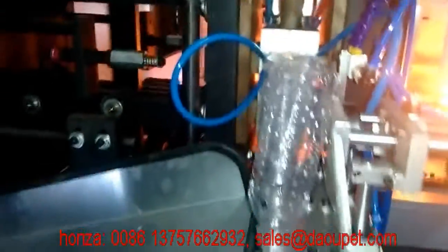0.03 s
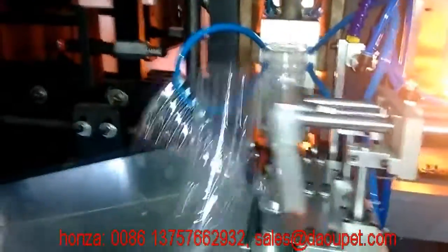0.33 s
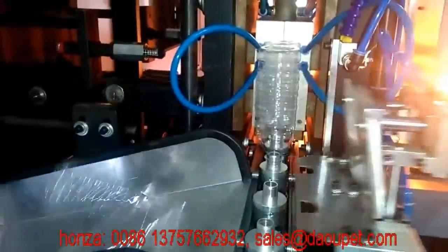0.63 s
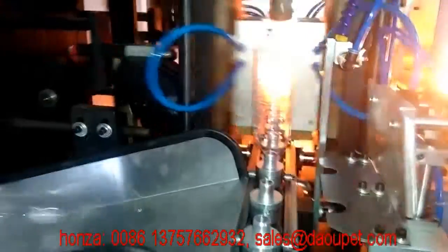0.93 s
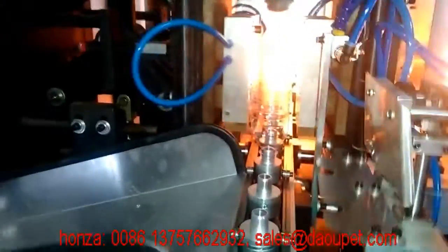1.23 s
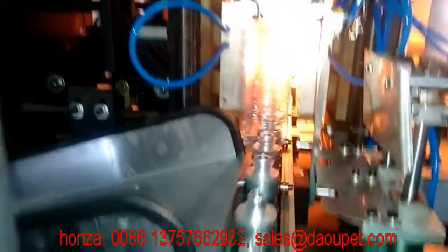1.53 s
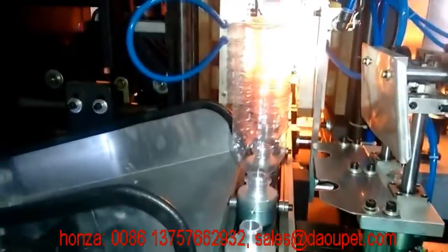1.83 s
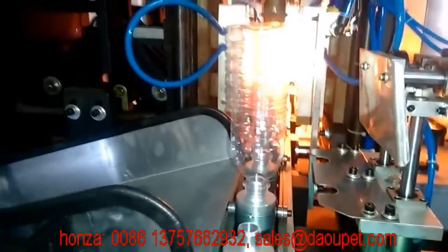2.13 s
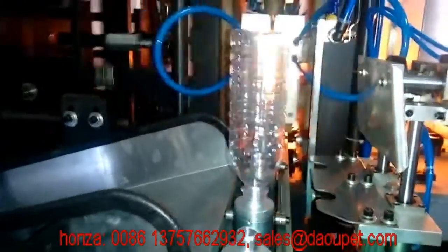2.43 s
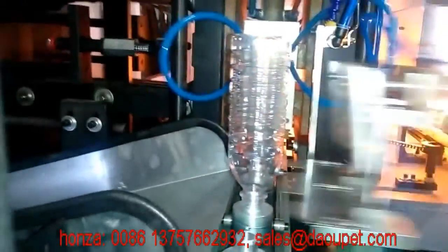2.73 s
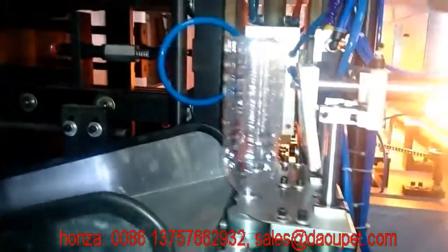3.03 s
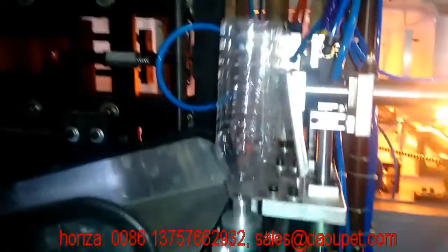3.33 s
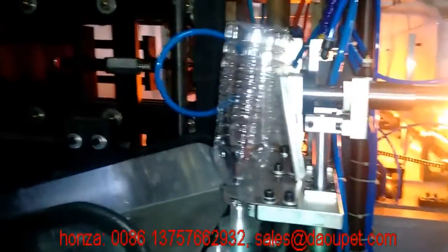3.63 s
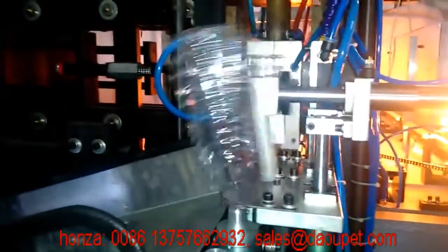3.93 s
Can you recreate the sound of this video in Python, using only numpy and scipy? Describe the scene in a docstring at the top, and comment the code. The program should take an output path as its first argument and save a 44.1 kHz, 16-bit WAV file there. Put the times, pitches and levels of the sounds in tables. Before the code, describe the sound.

Close up in a factory, a bottle blowing machine rumbles and clatters through one cycle. Its mould thuds and valves hiss, a heavy boom leads into whistling air bursts, and a sharp, booming knock precedes the last metal clacks.

```python
"""A bottle blowing machine runs through one cycle, close to a pair of microphones in a factory.
From the start a piston compressor throbs under the rattling drive. The mould thuds, panels knock,
valves let off air and steel grippers clack against their stops; then a slide groans briefly.
At 1.4 s a heavy blow leaves the frame booming, and a run of hissing, whistling jets follows.
Just after 3 s come the hardest knock and a second boom; a last hiss and two clacks end the cycle."""
import sys
import numpy as np
from scipy import signal
from scipy.fft import rfft, irfft
from scipy.io import wavfile

SR = 44100
rng = np.random.default_rng(int(sys.argv[2]) if len(sys.argv) > 2 else 0)


def output_pcm(signal):
    """Save a mono or channel-first signal as 16-bit PCM at the path in sys.argv[1].

    Samples are clipped to [-1, 1] before scaling.
    """
    pcm = np.clip(np.atleast_2d(signal).T, -1, 1) * 32767
    wavfile.write(sys.argv[1], SR, np.round(pcm).astype(np.int16))


N = 176400
T, HZ = np.arange(N) / SR, np.fft.rfftfreq(N, 1 / SR)


def amp(db):
    """Decibels to amplitude ratio."""
    return 10 ** (np.asarray(db) / 20)


def unit(x):
    """Normalisation to rms 1."""
    return x / np.sqrt(np.mean(x ** 2) + 1e-20)


def over_frequency(points):
    """Interpolation along log frequency."""
    hz, value = np.transpose(points)
    return np.interp(np.log(HZ + 1), np.log(hz + 1), value)


def over_time(rows, column):
    """Linear interpolation of one column in time."""
    rows = np.array(rows)
    return np.interp(T, rows[:, 0], rows[:, column])


def white():
    """Two uncorrelated noises: direct and scattered sound."""
    return rng.standard_normal((2, N))


def colour(x, spectrum):
    """Spectral shaping, at rms 1."""
    return unit(irfft(rfft(x) * amp(over_frequency(spectrum)), N))


def drift(rate_hz):
    """Low-pass random fluctuation, at rms 1."""
    return unit(irfft(rfft(rng.standard_normal(N)) / (1 + (HZ / rate_hz) ** 4), N))


def burst(start, t60, rise_s):
    """Linear attack and exponential decay, 60 dB in t60 seconds."""
    t = np.maximum(T - start, 0)
    return np.minimum(t / rise_s, 1) * amp(-60 * t / t60)


def tone(hz, waver_hz=0.99, waver_db=1.5):
    """A sinusoid with slight random frequency and amplitude modulation."""
    turns = np.cumsum(hz + waver_hz * drift(rate_hz=5.25)) / SR + rng.random()
    return np.sqrt(2) * np.sin(2 * np.pi * turns) * amp(waver_db * drift(rate_hz=8))


# Mould and carriage blows. Each row: start in seconds, level in dB, t60 in seconds, treble lift in dB.
MOULD_BLOWS = [(0.074, -14.5, 0.21, -13), (0.389, -14, 0.11, -11), (0.477, -13, 0.069, -14),
               (0.65, -19, 0.41, -4), (1.39, -16.5, 0.68, -9.5), (1.792, -11.5, 0.059, -7),
               (1.99, -17, 0.15, -16), (2.88, -20.5, 0.44, -5.5), (3.16, -14, 0.79, 0.5),
               (3.191, -24, 0.52, 6)]
# The frame's response. Each row: frequency in Hz, relative level in dB.
FRAME_SPECTRUM = [(40, -30), (120, -35), (280, 4.5), (450, -0.5), (800, 2.5), (1200, -4.5), (1800, -11),
                  (2500, -3.5), (3000, -7), (3800, -11.5), (6000, -14), (15000, -35)]

def mould_thuds(treble_hz=1260):
    """Impact excitation: heavy blows shake frame resonances so dense that they merge into noise."""
    out = np.zeros((2, N))
    treble = HZ ** 2 / (HZ ** 2 + treble_hz ** 2)
    for start, db, t60, lift_db in MOULD_BLOWS:
        shake = irfft(rfft(colour(white(), FRAME_SPECTRUM)) * amp(lift_db * treble), N)
        out += amp(db) * shake * burst(start, t60, rise_s=0.0028)
    return out


# Blows on panels. Each row: start in seconds, frequency in Hz, level in dB, t60 in seconds.
PANEL_BLOWS = [(.096, 900, -15, .05), (.316, 1790, -21.5, .055), (.564, 1750, -23, .04),
               (1.393, 470, -13, .035), (1.397, 1210, -16, .06), (1.402, 1655, -22, .05),
               (3.162, 660, -1.5, .028), (3.166, 3050, -11, .03), (3.191, 690, -8.5, .055),
               (3.222, 540, -12, .04)]

def panel_knocks():
    """Damped free vibration: each hard contact sets one panel swinging briefly."""
    return sum(amp(db) * np.sin(2 * np.pi * hz * (T - start)) * burst(start, t60, rise_s=.001)
               for start, hz, db, t60 in PANEL_BLOWS)


# Frame booms. Each row: start in seconds, first and final pitch in Hz, level in dB, t60 in seconds.
FRAME_BOOMS = [(1.401, 339.4, 257.6, -15.5, 0.43), (3.166, 492, 396, -21, 0.92)]

def frame_booms(sag_s=0.086, jitter_hz=14, shudder_hz=66.5):
    """Pitch glide: the frame sags under the heaviest blows, and its shuddering ring falls."""
    out = np.zeros(N)
    for start, from_hz, to_hz, db, t60 in FRAME_BOOMS:
        t = np.maximum(T - start, 0)
        hz = to_hz + (from_hz - to_hz) * np.exp(-t / sag_s) + jitter_hz * drift(rate_hz=72.5)
        ring = np.sin(2 * np.pi * np.cumsum(hz) / SR)
        shudder = 1 - 0.64 * np.cos(2 * np.pi * shudder_hz * t)
        out += amp(db) * ring * shudder * burst(start, t60, rise_s=0.021)
    return out


# Grippers meeting their stops. Each row: start in seconds, relative level in dB,
# decay time of the contact in seconds, brightness in dB per octave.
GRIPPER_HITS = [(0.108, -12, 0.009, 9), (0.137, -24, 0.032, -0.5), (.56, -20, 0.0072, 4),
                (.66, -24.5, 0.02, 16), (0.948, -25, 0.0082, 14), (2.714, -8.5, 0.0031, 15),
                (2.904, -19, 0.0058, 3), (3.904, -13, 0.015, 4), (3.938, -14.5, 0.01, -1.5)]
# Modes of the steel. Each row: frequency in Hz, relative level in dB.
STEEL_MODES = [(1790, -1.5), (2095, 9), (3428, -11), (3800, 3), (4030, 2.5), (4330, -1), (4465, -2),
               (4550, 5.5), (4750, -2.5)]

def gripper_clacks(t60=.055, spread_db=3, detune=.01, scrape_db=-8.5, gain_db=3.5):
    """Modal ringing: a chattering contact force is convolved with the steel's impulse response."""
    out, t = np.zeros((2, N)), T[:SR // 4]
    for start, db, contact_s, tilt_db in GRIPPER_HITS:
        chatter = rng.standard_normal((2, len(t))) * np.minimum(t / 0.0017, 1) * np.exp(-t / contact_s)
        ring = np.zeros(len(t))
        for hz, mode_db in STEEL_MODES:
            struck_db = mode_db + tilt_db * np.log2(hz / 1000) + spread_db * rng.standard_normal()
            struck_hz = hz * (1 + detune * rng.standard_normal())
            ring += amp(struck_db - 60 * t / t60) * np.sin(2 * np.pi * struck_hz * t)
        rung = unit(signal.fftconvolve(chatter, ring[None], axes=1)[:, :len(t)]) * np.std(chatter)
        clack = rung + amp(scrape_db) * chatter
        span = out[:, round(start * SR):][:, :len(t)]
        span += amp(gain_db + db) * clack[:, :span.shape[1]]
    return out


# Air valves. Each row: start in seconds, open time in seconds, level in dB, loss in dB per second.
VALVE_OPENINGS = [(0.09, 0.018, -17, 25), (.135, 0.012, -26, 20), (.305, 0.027, -23, 89),
                  (.385, 0.085, -23, 20), (.52, .14, -25.5, 9), (0.652, 0.013, -13, 32),
                  (1.78, 0.071, -24.5, 25), (1.99, 0.11, -18, 14), (2.1, 0.11, -21.5, 38),
                  (2.22, 0.11, -23.5, 1), (2.47, 0.009, -22, 87), (2.69, 0.058, -21, 17),
                  (2.745, 0.45, -24.5, 15), (3.165, 0.11, -19.5, 29), (3.887, 0.022, -18.5, 4),
                  (3.935, 0.0085, -25, 20)]
# A jet's hiss. Each row: frequency in Hz, relative level in dB.
JET_SPECTRUM = [(500, -31), (2200, -13), (3300, -6.5), (4300, -9), (4950, 0), (6000, 0.5), (6700, -2),
                (8600, 3.5), (10100, 2.5), (11500, -0.5), (13500, -10), (15500, -12)]

def valve_jets(open_s=0.0067, shut_s=0.015):
    """Jet noise: each jet weakens as its pressure falls, and overlapping jets add in power."""
    power = np.zeros(N)
    for start, length, db, loss in VALVE_OPENINGS:
        t = np.maximum(T - start, 0)
        taper_s = 0.091 * length  # long jets swell and die away slowly
        opening = np.minimum(t / (open_s + taper_s), 1)
        closing = np.exp(-np.maximum(t - length, 0) / (shut_s + taper_s))
        power += (opening * closing * amp(db - loss * t)) ** 2
    return colour(white(), JET_SPECTRUM) * np.sqrt(power)


# Whistles. Each row: time of the peak in seconds, half width in seconds, level in dB.
EDGE_TONES = [(1.82, 0.045, -29), (2.712, 0.028, -25), (2.84, 0.096, -27.5)]

def valve_whistles(centre_hz=8560, half_width_hz=300, flutter_db=2.5):
    """Edge tone: a jet crossing a valve's edge gives a breathy, fluttering band."""
    band = unit(irfft(rfft(white()) / (1 + ((HZ - centre_hz) / half_width_hz) ** 2), N))
    swells = sum(amp(db) * np.exp(-((T - peak) / width) ** 2) for peak, width, db in EDGE_TONES)
    return band * swells * amp(flutter_db * drift(rate_hz=35))


# The slide's groan. Each row: time in seconds, pitch in Hz, relative level in dB.
SLIDE_GLIDE = [(.69, 424, -32.5), (.78, 434, -31.5), (.825, 451, -24.5), (.905, 458, -24.5),
               (.935, 471, -32.5), (1.01, 477, -33.5)]

def slide_groan(jitter_hz=5, flutter_db=1.8):
    """Friction-driven vibration: a rubbing guide rises in pitch as it speeds up."""
    turns = np.cumsum(over_time(SLIDE_GLIDE, column=1) + jitter_hz * drift(rate_hz=33)) / SR
    moving = (T > SLIDE_GLIDE[0][0]) & (T < SLIDE_GLIDE[-1][0])
    level_db = over_time(SLIDE_GLIDE, column=2) + flutter_db * drift(rate_hz=51)
    return np.sqrt(2) * np.sin(2 * np.pi * turns) * moving * amp(level_db)


# Levels as heard: they follow the machine and duck abruptly, as under a recorder's gain control
# at sharp clacks. Each row: time in seconds, relative levels of rumble, clatter and leak in dB.
HEARD_LEVELS = [(0, -26.5, -19.5, -24.5), (.095, -21.5, -24.5, -23.5), (.13, -29, -29.5, -31),
                (.28, -30.5, -25.5, -29), (.45, -26, -25, -21), (.65, -24.5, -23, -20),
                (.71, -32.5, -29.5, -25), (1.15, -28, -26.5, -29.5), (1.37, -27, -27.5, -28.5),
                (1.52, -26, -23, -28), (1.92, -20.5, -20, -22.5), (2.15, -25, -23.5, -27),
                (2.32, -22, -21, -25), (2.36, -27.5, -26.5, -25), (2.65, -24.5, -23.5, -26.5),
                (2.8, -28, -22.5, -22.5), (3.02, -21.5, -21.5, -21.5), (3.32, -25.5, -21, -24.5),
                (3.46, -25, -22.5, -27), (3.89, -20, -19, -21.5), (3.925, -29, -27.5, -27),
                (4, -27.5, -24, -26.5)]
# Spectra of the drive's rumble and clatter. Each row: frequency in Hz, relative level in dB.
RUMBLE_SPECTRUM = [(20, -12), (35, -10), (55, -11.5), (85, -3.5), (130, -1.5), (200, 2), (330, 4.5),
                   (480, -1), (900, -13), (3000, -70)]
CLATTER_SPECTRUM = [(60, -39), (200, -14.5), (350, 2.5), (480, -8.5), (800, -2), (1000, -7.5),
                    (1400, -10.5), (1900, -13), (2500, -12.5), (4300, -21.5), (8000, -39), (16000, -60)]
STROKE_HZ = 15.23

def drive(taps_per_s=260, tap_spread_db=4.5, flicker_db=1.2, rumble_db=-5.5, clatter_db=-4.5):
    """Amplitude modulation: the pistons make the rumble throb, while loose parts tap at random."""
    throb = 1 + 0.12 * sum(np.cos(2 * np.pi * k * STROKE_HZ * T) for k in (1, 2, 4))
    rumble = unit(colour(white(), RUMBLE_SPECTRUM) * throb)
    rumble *= amp(rumble_db + over_time(HEARD_LEVELS, column=1))
    taps = white() * amp(tap_spread_db * np.minimum(rng.exponential(1, N), 3))
    taps *= rng.random(N) < taps_per_s / SR
    clatter = colour(unit(white()) + 0.34 * unit(taps), CLATTER_SPECTRUM)
    clatter *= amp(clatter_db + over_time(HEARD_LEVELS, column=2) + flicker_db * drift(rate_hz=18))
    return rumble + clatter


# Compressor harmonics. Each row: multiple of the stroke rate, relative level in dB.
COMPRESSOR_ORDERS = [(6, -50), (8, -41.5), (11, -43.5), (12, -33.5), (13, -39.5), (14, -49), (23, -38.5),
                     (35, -42), (45, -42.5), (49, -40.5), (58, -40), (67, -45.5)]

def compressor_hum(gain_db=24):
    """Harmonic series: periodic piston strokes give tones that swell with the rumble."""
    orders = sum(amp(db) * tone(k * STROKE_HZ) for k, db in COMPRESSOR_ORDERS)
    return orders * amp(gain_db + over_time(HEARD_LEVELS, column=1))


# Tones of the drive motor. Each row: frequency in Hz, relative level in dB.
MOTOR_LINES = [(583, -35), (757, -41), (1264, -50.5), (1309, -45.5), (1335, -46.5)]

def motor_whine(gain_db=-4.5, follow=2.1):
    """Line spectrum: the motor's tones stand out when the drive clatters loudly."""
    lines = sum(amp(db) * tone(hz) for hz, db in MOTOR_LINES)
    clatter_db = over_time(HEARD_LEVELS, column=2)
    return lines * amp(gain_db + follow * (clatter_db - clatter_db.mean()))


# The leak's hiss. Each row: frequency in Hz, relative level in dB.
LEAK_SPECTRUM = [(500, -13), (1900, -11), (3000, -6.5), (4200, -5), (5500, 1.5), (7300, -1), (8700, 0),
                 (9600, 1.5), (10300, 5), (11000, -2.5), (13000, -7), (15500, -23.5)]

def air_leak(gain_db=-2):
    """Broadband flow noise: leaking air hisses throughout the cycle."""
    return colour(white(), LEAK_SPECTRUM) * amp(gain_db + over_time(HEARD_LEVELS, column=3))


# Likeness of left and right. Each row: frequency in Hz, coherence from 0 to 1.
COHERENCE = [(100, 0.54), (450, 0.66), (1150, 0.95), (2350, 1), (3500, 0.82), (4650, 0.66), (5900, 0.25),
             (8500, 0.22), (10000, 0.34), (12000, 0.14)]
# Stereo balance. Each row: frequency in Hz, left minus right level in dB.
BALANCE = [(200, -1.5), (500, 1.2), (1300, -1), (2400, 0), (4500, -1.5), (6000, -6), (9400, -4),
           (11000, -15), (15000, -14)]

def microphone_pair(sound, lag_s=.000425, lag_from_hz=1150, one_sided_hz=5500):
    """Partial coherence: the sides swing in and out of phase with frequency; the left is duller."""
    direct, scattered = rfft(sound)
    phase = 2 * np.pi * lag_s * np.maximum(HZ - lag_from_hz, 0)
    one_sided = HZ ** 4 / (HZ ** 4 + one_sided_hz ** 4)  # the top treble reaches the left side late
    same = np.clip(over_frequency(COHERENCE), 0, .99) * (np.cos(phase) - 1j * one_sided * np.sin(phase))
    left = (same * direct + np.sqrt(1 - abs(same) ** 2) * scattered) * amp(over_frequency(BALANCE))
    return irfft(np.array([left, direct]), N)


def scene():
    """Superposition: the noisy sources spread between left and right, and the tonal ones are panned."""
    noises = drive()
    noises += (valve_jets() + air_leak()) * amp(.5 * drift(rate_hz=41))  # the hiss flickers slightly
    noises += valve_whistles() + mould_thuds() + gripper_clacks()
    centred = panel_knocks() + frame_booms()
    hum = (compressor_hum() + motor_whine()) * amp([[-1], [0]])
    groan = slide_groan() * amp([[-2], [1]])
    return microphone_pair(noises) + centred + hum + groan


def record(dry, ceiling=.9, edge_hz=15500):
    """Soft saturation rounds off the highest peaks; a low-pass filter then limits the band."""
    rounded = dry / (1 + (dry / ceiling) ** 6) ** (1 / 6)
    low_pass = signal.firwin(511, edge_hz, window=("kaiser", 9), fs=SR)
    return signal.oaconvolve(rounded, low_pass[None], "same")


dry = scene()
out = record(dry)
output_pcm(out)
```